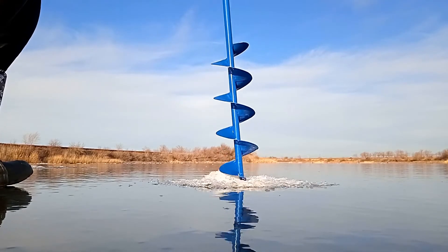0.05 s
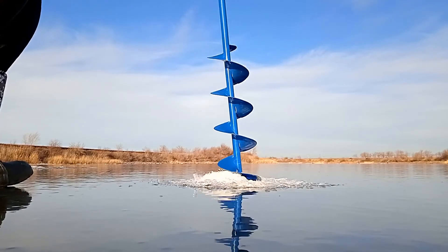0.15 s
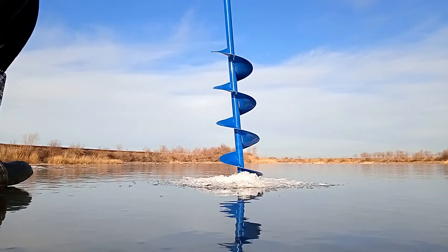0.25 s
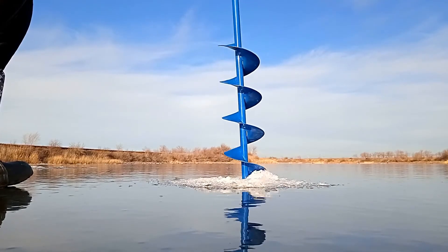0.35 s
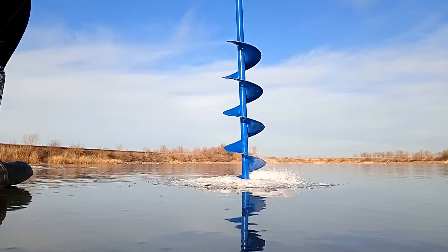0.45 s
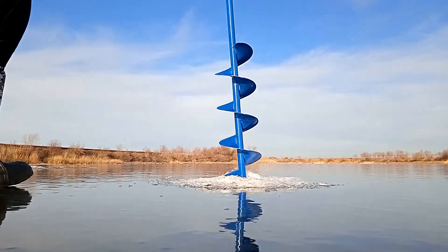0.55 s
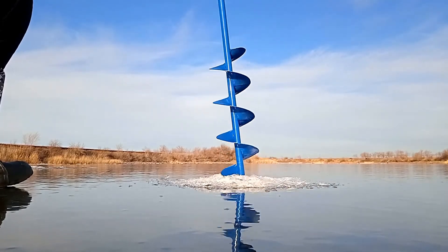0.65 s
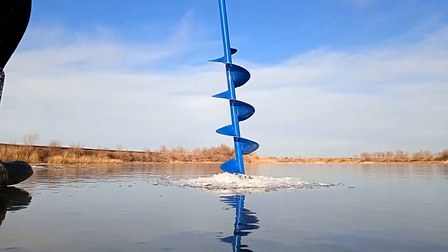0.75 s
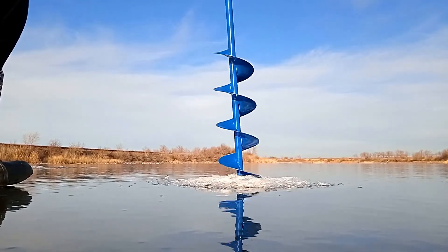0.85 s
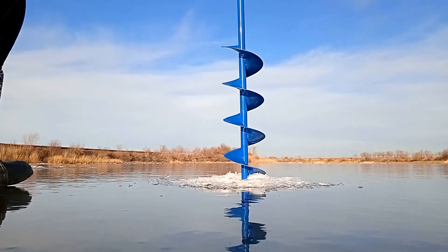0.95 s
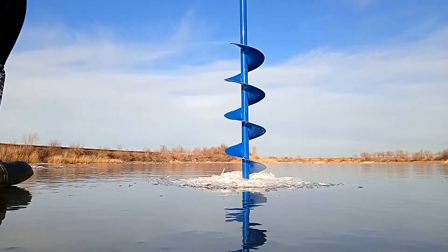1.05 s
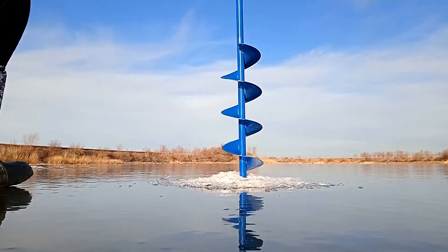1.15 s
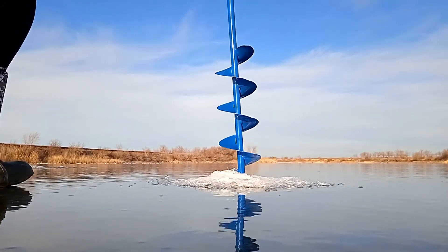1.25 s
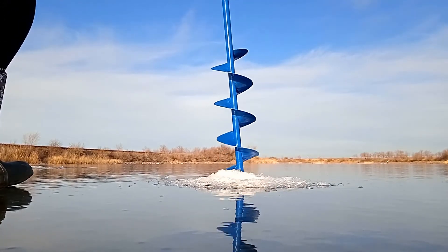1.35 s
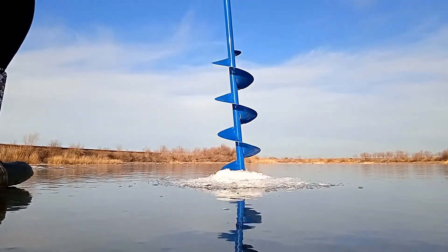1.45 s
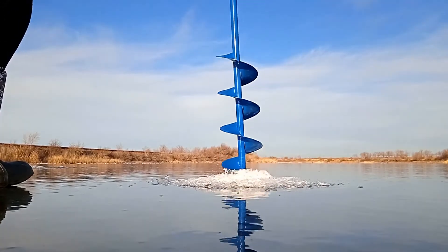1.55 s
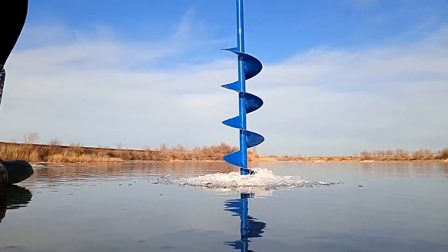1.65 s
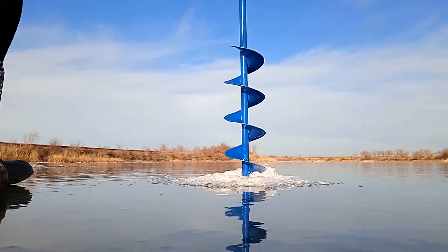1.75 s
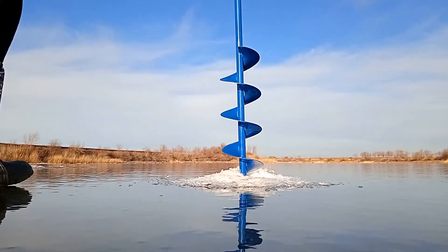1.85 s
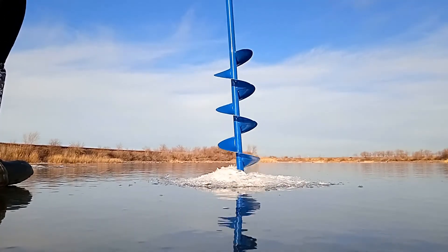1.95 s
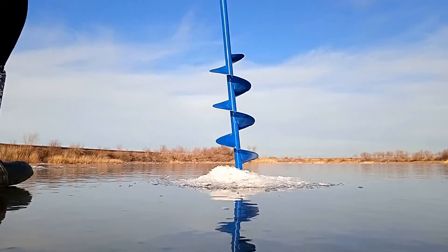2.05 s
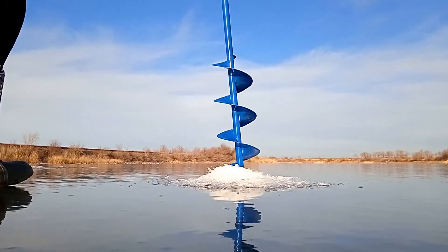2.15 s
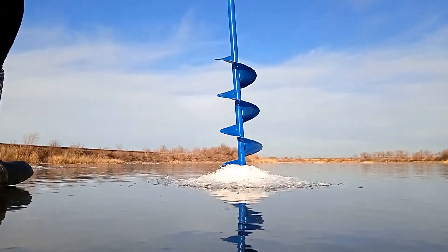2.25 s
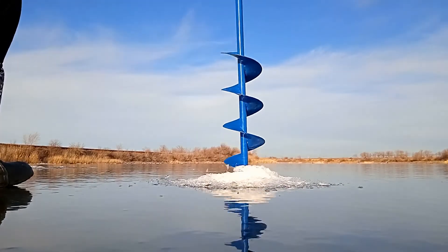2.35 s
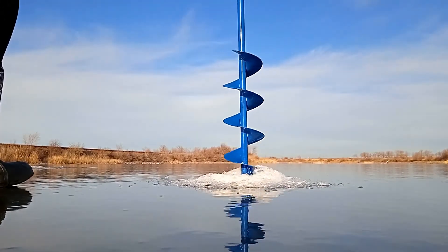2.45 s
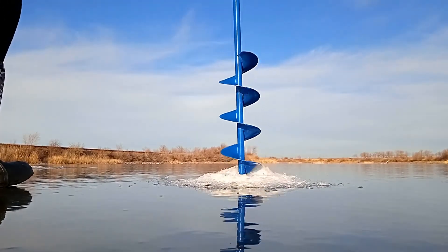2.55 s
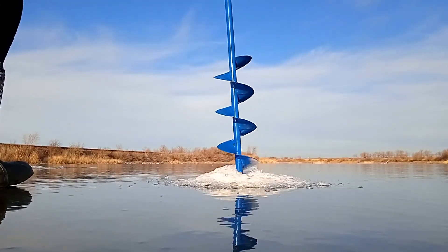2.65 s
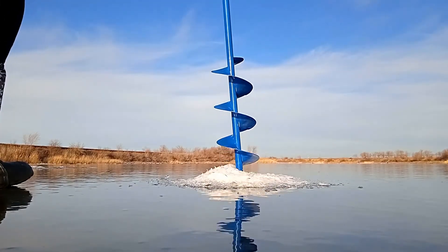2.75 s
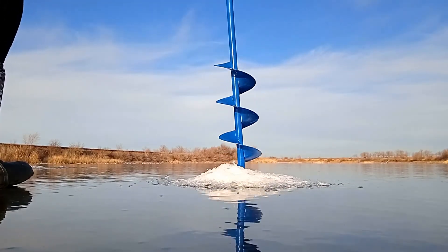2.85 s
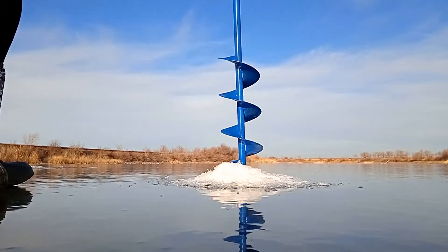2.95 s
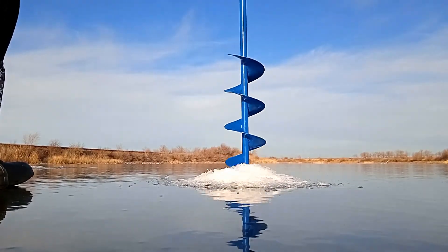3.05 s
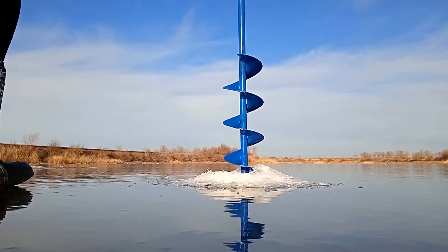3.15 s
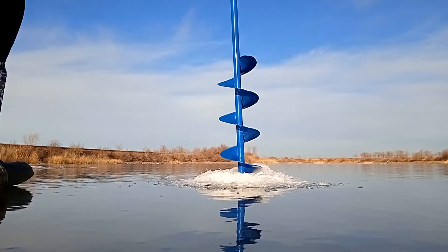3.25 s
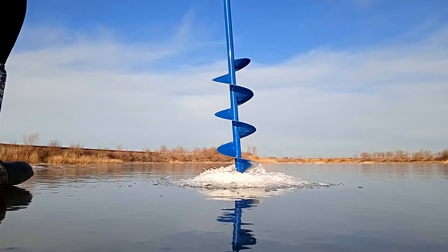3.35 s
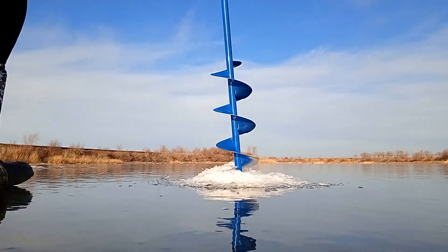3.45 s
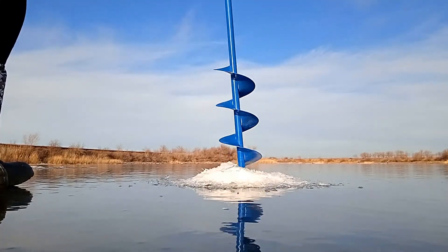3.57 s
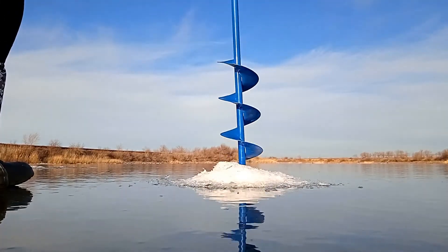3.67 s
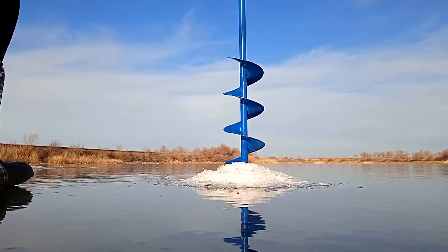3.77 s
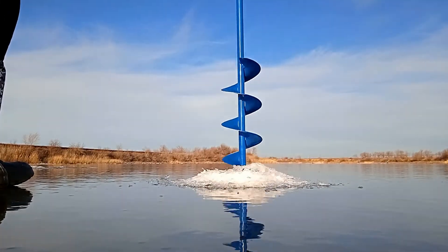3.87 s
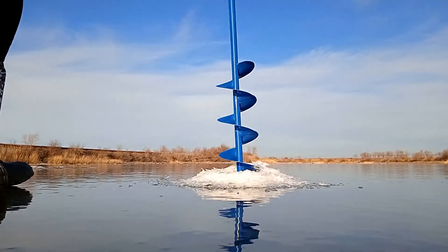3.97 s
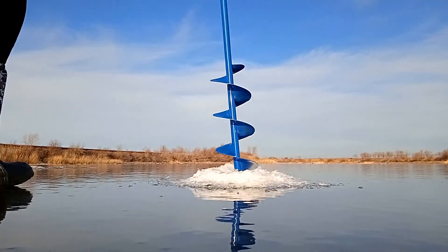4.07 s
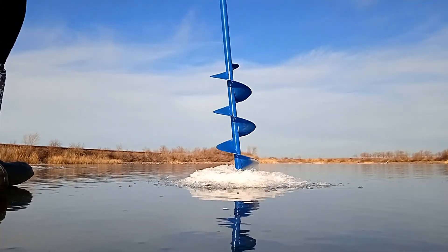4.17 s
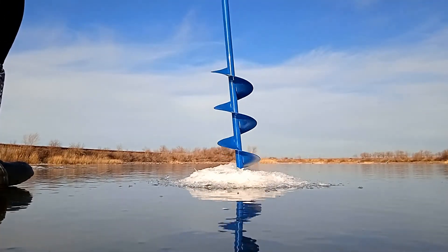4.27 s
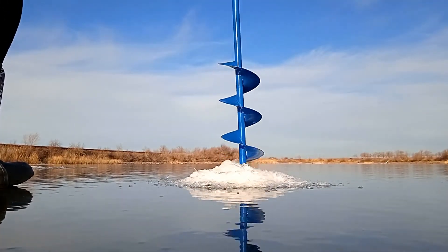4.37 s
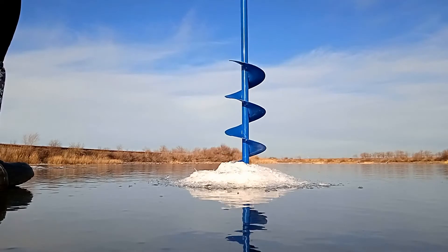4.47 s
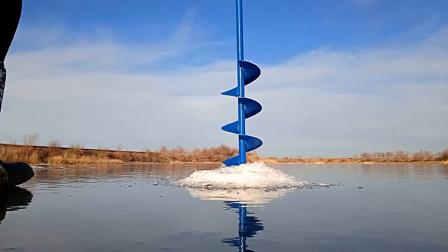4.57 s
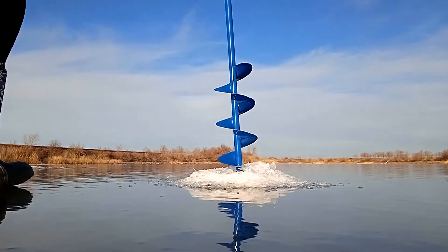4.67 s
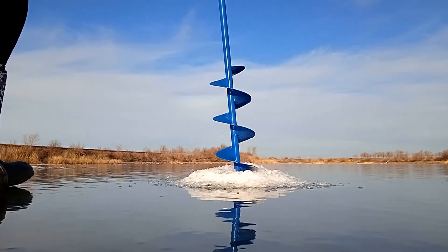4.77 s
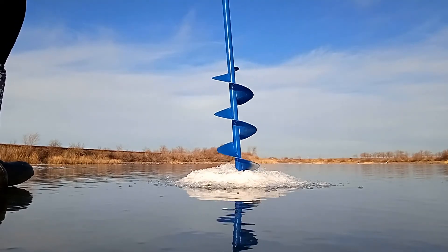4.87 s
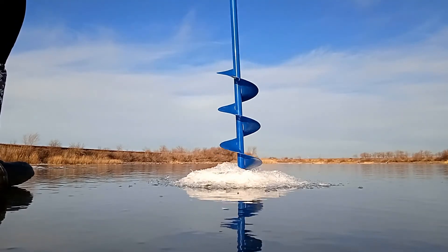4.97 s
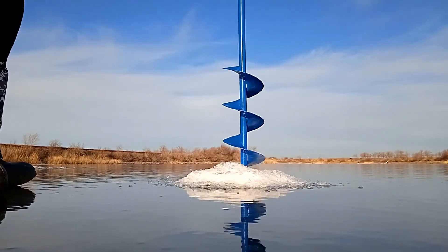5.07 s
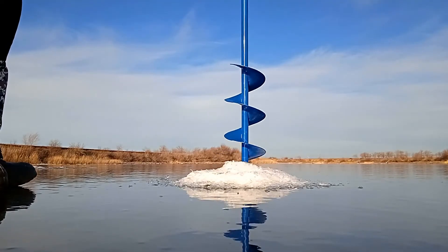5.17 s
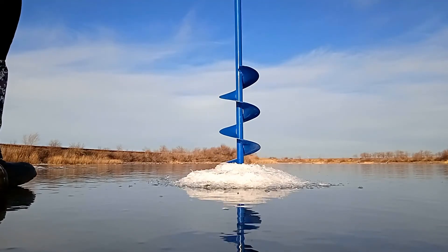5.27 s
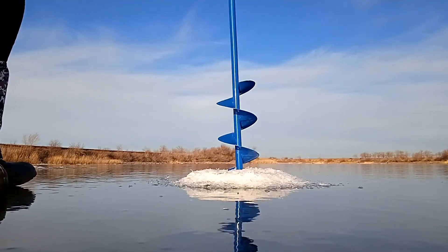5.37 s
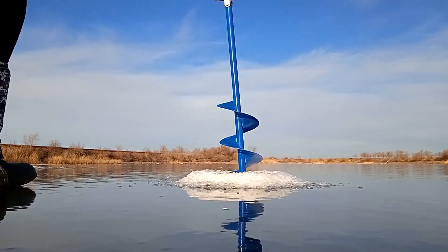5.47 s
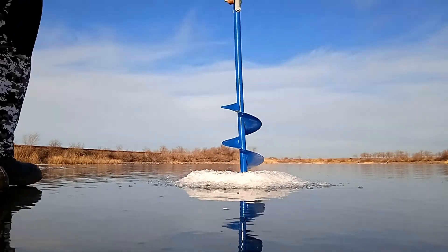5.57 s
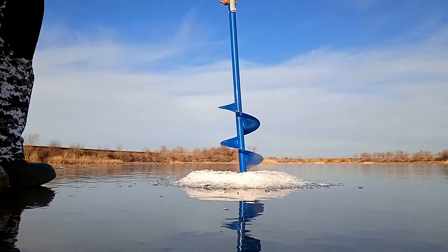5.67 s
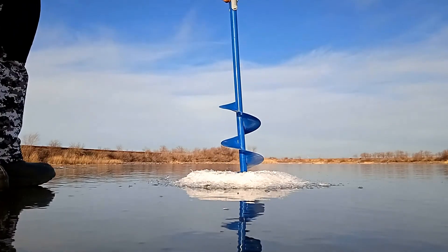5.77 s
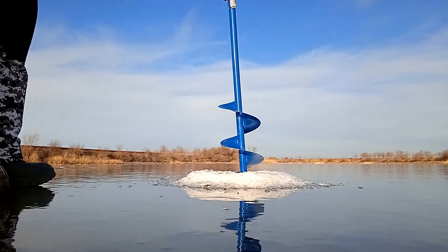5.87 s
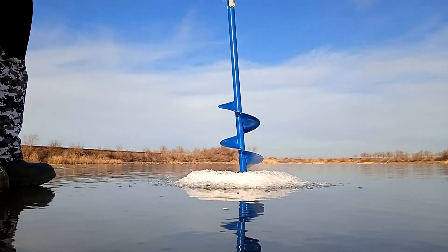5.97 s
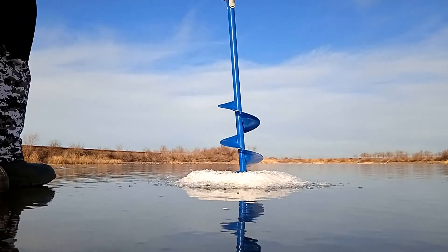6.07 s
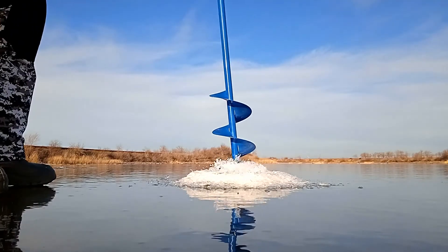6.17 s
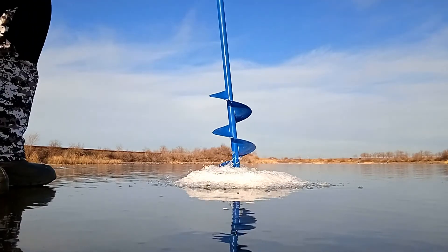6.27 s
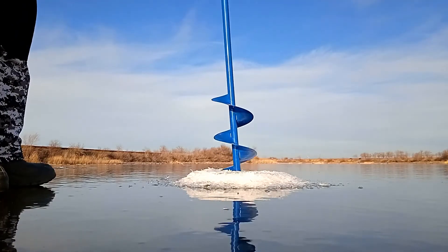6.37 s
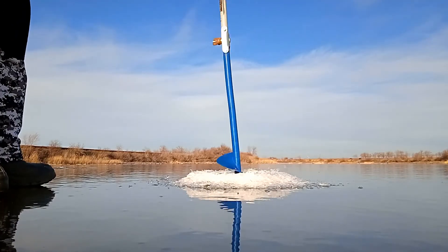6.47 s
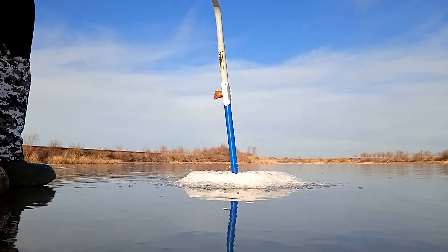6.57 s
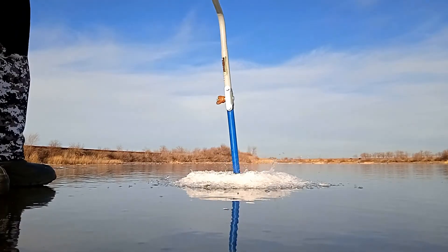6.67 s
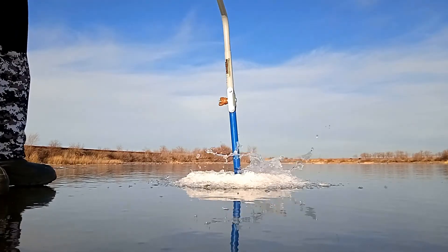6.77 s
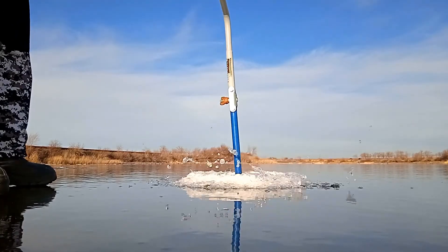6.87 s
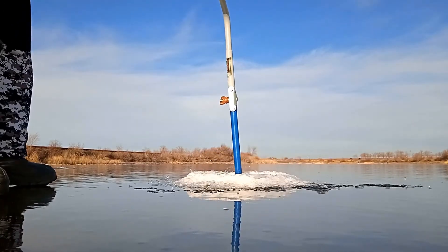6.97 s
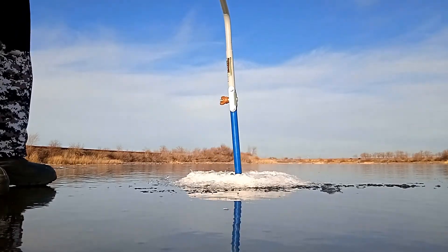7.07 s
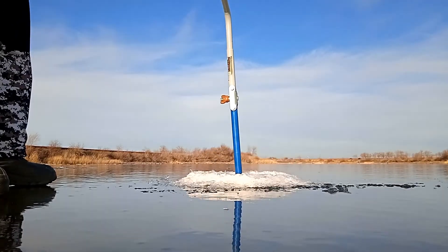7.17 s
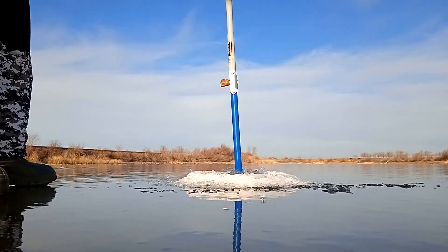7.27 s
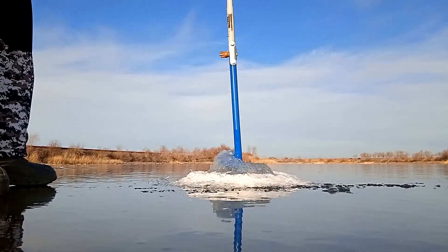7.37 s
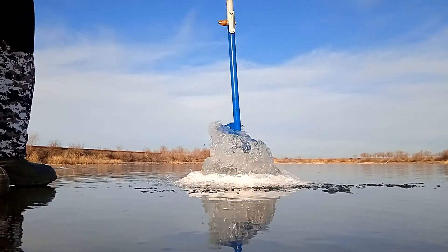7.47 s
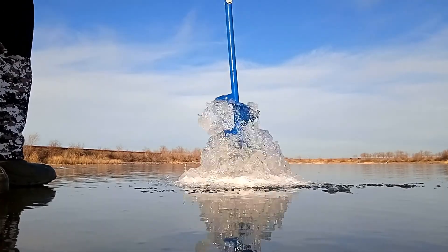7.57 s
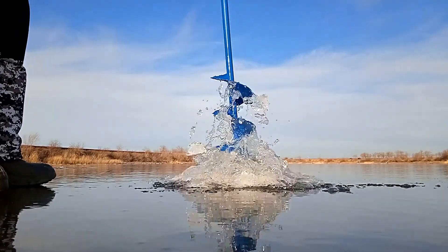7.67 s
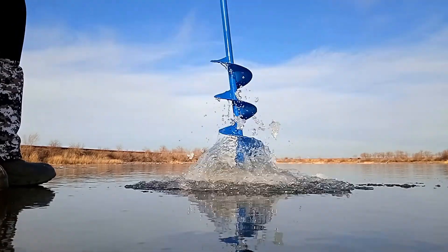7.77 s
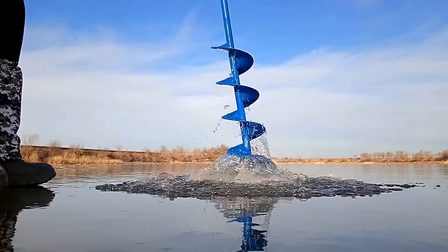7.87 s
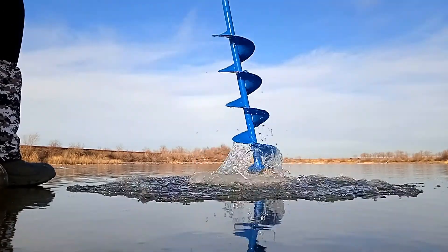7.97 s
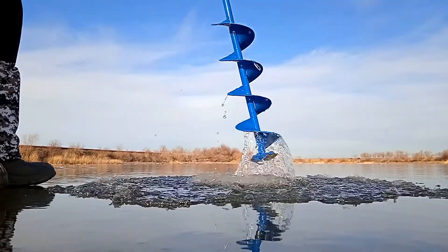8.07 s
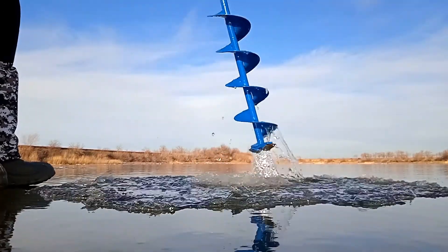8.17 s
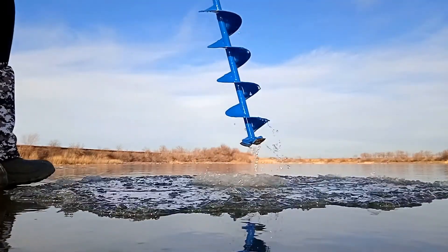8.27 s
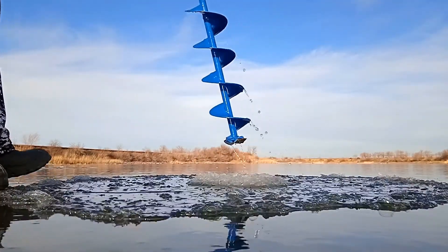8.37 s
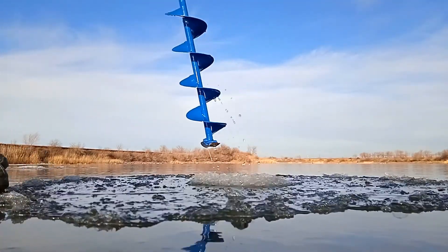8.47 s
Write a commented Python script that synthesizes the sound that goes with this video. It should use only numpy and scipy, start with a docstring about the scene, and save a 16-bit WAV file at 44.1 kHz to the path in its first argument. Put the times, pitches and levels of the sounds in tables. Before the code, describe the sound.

A hand auger cuts into pond ice, its blades rasping and crackling in swells with each turn while the steel rings. Wind gusts rumble on the microphone, which lies on the ice close by. The grinding stops, and after a pause the auger breaks through in two crunching jolts with a sharp ping. Water then gulps, sloshes and drips as the auger is pulled out.

```python
"""A frozen pond in a gusty breeze, the microphone lying on the ice close to a hand auger.
The turning blades chip the ice and ring the steel shaft and flights, while wind rumbles on the mic.
The cutting stops at about 5.3 s; after a pause the auger breaks through in two crunching jolts
that thud in the sheet. Trapped air gulps in the hole, and water and slush well up, slosh and
drip as the auger is pulled out."""
import sys
import numpy as np
from scipy import signal
from scipy.io import wavfile
from scipy.ndimage import uniform_filter1d

SR = 44100
rng = np.random.default_rng(int(sys.argv[2]) if len(sys.argv) > 2 else 0)


def store_pcm(level_fs):
    """Save levels as 16-bit WAV."""
    pcm = np.round(np.clip(level_fs, -1, 1) * 32767).astype(np.int16)
    wavfile.write(sys.argv[1], SR, np.atleast_2d(pcm).T)


N = 375907
TIME = np.arange(N) / SR
EVENT_TIME = np.arange(9000) / SR  # the span of one short sound


def gain_of(db):
    """Turns dB into a factor."""
    return 10 ** (np.asarray(db) / 20)


def unit_rms(x):
    """Scales to rms 1."""
    return x / np.sqrt(np.mean(x ** 2) + 1e-20)


def curves(rows):
    """Joins timed rows with straight lines, one curve for each column after the time."""
    times, *values = np.transpose(rows)
    return [np.interp(TIME, times, v) for v in values]


def add(mix, start_s, sound):
    """Mixes a sound in at its start time."""
    part = mix[round(start_s * SR):][:len(sound)]
    part += sound[:len(part)]


def colour(x, points):
    """Minimum-phase filter through (Hz, dB) points."""
    point_hz, db = np.transpose(points)
    hz = abs(np.fft.fftfreq(8192, 1 / SR))
    log_gain = np.log(gain_of(np.interp(np.log(hz + 1), np.log(point_hz + 1), db)))
    response = np.exp(np.conj(signal.hilbert(log_gain)))
    taps = np.fft.ifft(response).real[:4096]
    return signal.oaconvolve(x, taps)[:len(x)]


def ring(x, hz, width_hz):
    """A resonance of gain 1 at its centre."""
    r = np.exp(-np.pi * width_hz / SR)
    feedback = [2, -4 * r * np.cos(2 * np.pi * hz / SR), 2 * r * r]
    return signal.lfilter([1 - r * r, 0, r * r - 1], feedback, x)


def drift(per_s):
    """A random curve that heads for a new value per_s times a second."""
    knots = rng.standard_normal(2000)
    return np.interp(TIME * per_s, np.arange(len(knots)), knots)


def grit(per_s, spread_db, hiss):
    """Clicks of uneven size over a share of smooth noise."""
    chance, size, noise = rng.random(N), rng.exponential(1, N), rng.standard_normal(N)
    clicks = (chance < per_s / SR) * gain_of(spread_db * np.minimum(size, 5)) * np.sign(noise)
    return unit_rms(unit_rms(clicks) + hiss * noise)


def patchy(x, depth_db):
    """Raises and lowers random patches of time and pitch."""
    spectrum = signal.stft(x, nperseg=512, noverlap=384)[2]
    patches = uniform_filter1d(rng.standard_normal(spectrum.shape), size=7, axis=0)
    patches = uniform_filter1d(patches, size=16, axis=1)
    spectrum *= gain_of(depth_db * unit_rms(patches))
    return signal.istft(spectrum, nperseg=512, noverlap=384)[1][:N]


def bump(centre_s, length_s, order=2):
    """A rise and fall of height 1; a higher order gives a flatter top and steeper edges."""
    return np.exp(-(abs(TIME - centre_s) / (.55 * length_s)) ** order)


def burst(db, rise_s, t60_s):
    """A quick rise into a steady decay."""
    return gain_of(db - 60 * EVENT_TIME / t60_s) * np.minimum(EVENT_TIME / rise_s, 1)


def bursts(rows, rise_s, t60_s):
    """An envelope with one burst for each (start, dB) row."""
    envelope = np.zeros(N)
    for start_s, db in rows:
        add(envelope, start_s, burst(db, rise_s, t60_s))
    return envelope


# The cut beside the mic, fading as the hole deepens.
# Each row: time in seconds, blade pressure in dB, feed to the shaft in dB.
CUT_LEVELS = [(0, -37, -7), (.45, -36.5, -5), (.9, -38.5, -1.5), (1.3, -38.5, 2.5), (2.0, -37, -1),
              (2.7, -39, 2), (3.4, -40.5, 2), (4.2, -41, -1), (4.9, -43.5, 1.5), (5.31, -40.5, -3.5),
              (5.36, -88, -7)]
# The blades skip and the cut dips. Each row: centre in seconds, depth in dB.
BLADE_SKIPS = [(.85, 2), (1.87, 3), (2.2, 4), (2.53, 4.5), (2.72, 0.5), (2.84, 1), (3.27, 6), (3.53, 1),
               (3.88, 6.5), (4.08, 11), (4.27, 2), (5.0, 3), (5.17, 4)]
# A blade bites off a larger chip. Each row: start in seconds, level in dB.
BLADE_BITES = [(0.132, -38.5), (0.371, -35.5), (0.428, -50.5), (0.759, -37), (0.966, -31.5), (0.997, -33),
               (1.189, -36.5), (1.221, -43), (1.687, -35), (1.711, -29), (1.951, -39.5), (2.002, -44.5),
               (2.3016, -54), (2.431, -33), (2.565, -34.5), (2.765, -39), (2.8596, -48), (2.99, -32.5),
               (3.015, -30.5), (3.1214, -52), (3.4497, -38), (3.831, -58), (3.974, -32.5), (4.029, -32.5),
               (4.114, -42), (4.149, -38), (4.429, -39), (4.69, -35.5), (4.774, -42), (4.834, -40),
               (4.9211, -35), (5.028, -37.5), (5.08, -35.5)]
CUTTING_ON = TIME < CUT_LEVELS[-1][0]
TURNS_PER_S = 1.463


def crank_swing(peak_s):
    """A swing between -1 and 1, once for each turn of the crank."""
    return np.cos(2 * np.pi * TURNS_PER_S * (TIME - peak_s))


def blade_force():
    """The blades press harder on each downward push of the crank, and skip and bite on the way."""
    pressure_db = curves(CUT_LEVELS)[0] + 1.4 * crank_swing(peak_s=0.55)
    pressure_db -= sum(db * bump(centre_s, length_s=0.064) for centre_s, db in BLADE_SKIPS)
    bites = bursts(BLADE_BITES, rise_s=0.0012, t60_s=0.092)
    return (gain_of(pressure_db + 2.02 * drift(45)) + bites) * CUTTING_ON


# Breaking ice, heard close. Each row: frequency in Hz, level in dB.
CHIP_SPECTRUM = [(120, -17), (250, 2.5), (400, -5), (750, -6), (1280, 0.5), (1600, 6.5), (2350, 10),
                 (2620, 1), (3000, 1.5), (5200, -7.5), (5700, 0), (7300, -8), (9000, 1), (16000, -8.5)]


def chips(force):
    """Ice breaks under the blades in a dense run of tiny clicks."""
    fractures = force * grit(1800, spread_db=3.35, hiss=0.65)
    return patchy(colour(fractures, CHIP_SPECTRUM), depth_db=3.95)


# Modes of the shaft, and of the blades and flights. Each entry: pitch in Hz.
SHAFT_PITCHES = [520, 623, 830]
BLADE_PITCHES = [980, 1111, 1187, 1405, 1573, 2122, 2335, 2800, 2900, 3232, 3340, 3600, 3740, 3880, 4465,
                 4550, 4655, 4830, 5000, 5180, 5400, 5600, 5790, 5950, 6340, 6790, 6950, 7300]
# The same modes, in the same order. Each row: width in Hz, level in dB.
SHAFT_MODES = [(22, .5), (17, -2.5), (40, -11.5)]
BLADE_MODES = [(25.3, -14.5), (14.6, -15), (15.2, -11.5), (14.5, -5), (22, -4.5), (37, -3), (60.6, 1),
               (60, -9.5), (43, -5), (35.2, -6), (16, -6), (60, -9.5), (34, -3), (60.4, -8.5), (35, -2.5),
               (22, -11), (35, -5), (40.4, -13.5), (40.2, -10), (40, -10), (59.2, -13), (150, -11.5),
               (60, -13), (60, -10), (120, -9.5), (25.03, -13), (200, -4), (80, -2.5)]
# One mode sings out. Each row: centre in seconds, pitch in Hz, rise in dB, length in seconds.
MODE_SQUEALS = [(.145, 1405, 10, .11), (.17, 3740, 13, .28), (1.45, 3740, 6, .15), (.595, 2900, 11, .09),
                (.7, 3740, 6, .2), (.925, 1187, 8, .25), (1.215, 1573, 11, .13), (1.365, 2900, 11, .09),
                (1.685, 2335, 8, .3), (1.735, 3340, 12, .16), (1.755, 1187, 9, .13), (2.105, 1405, 11, .14),
                (2.135, 3740, 7, .13), (2.32, 4550, 8, .1), (1.2, 4465, 5, .3), (2.955, 1187, 9, .25),
                (3.895, 2122, 11, .15), (3.99, 1187, 11, .12), (4.82, 1187, 11, .1), (4.8, 1405, 10, .1),
                (5.06, 2335, 10, .15), (5.1, 1573, 10, .08)]


def steel_ring(drive, pitches, modes, wander_db, per_s):
    """The point of contact wanders, so each mode of the steel is fed more or less in turn."""
    sound = np.zeros(N)
    for k, (hz, (width, db)) in enumerate(zip(pitches, modes)):
        feed_db = db + wander_db * drift(per_s)
        for centre_s, squeal_hz, rise_db, length_s in MODE_SQUEALS:
            if squeal_hz == hz:
                feed_db += (db + rise_db - feed_db) * bump(centre_s, length_s)
        sound += (-1) ** k * ring(gain_of(feed_db) * drive, hz, width) / np.sqrt(width)
    return sound


def flights(drive, width_hz=34.6, wander_db=8.5):
    """The thin flights hold a crowd of faint high modes, caught more or less in turn."""
    sound = np.zeros(N)
    for hz in np.geomspace(5400, 11450, num=60) * rng.uniform(.99, 1.01, size=60):
        feed = gain_of(wander_db * np.tanh(drift(9.8)))
        sound += ring(feed * drive, hz, width_hz)
    return patchy(sound / np.sqrt(width_hz), depth_db=4.5)


# The high hiss of shavings, heard close. Each row: frequency in Hz, level in dB.
SHAVING_SPECTRUM = [(5000, -35.5), (8000, 3.5), (16000, 5.5)]


def shavings(force):
    """Fine shavings slide up the flights, following the smoothed force of the blades."""
    flow = uniform_filter1d(force, size=3000) * CUTTING_ON
    return flow * colour(rng.standard_normal(N), SHAVING_SPECTRUM)


def auger():
    """Chips breaking under the blades reach the mic directly and ring the shaft and steel."""
    force = blade_force()
    drive = force * grit(3500, spread_db=3.85, hiss=0.52)
    cut = gain_of(2.5) * chips(force)
    cut += gain_of(36.5) * steel_ring(drive, BLADE_PITCHES, BLADE_MODES, wander_db=4.8, per_s=10)
    cut += gain_of(20.5) * flights(drive)
    low = signal.sosfilt(signal.butter(4, 2550, fs=SR, output="sos"), cut)
    high = signal.sosfiltfilt(signal.butter(2, 4000, "high", fs=SR, output="sos"), cut)
    cut += (gain_of(5) - 1) * low  # body weight on the handle darkens the cut
    cut += (gain_of(crank_swing(peak_s=0.33)) - 1) * high  # the bright rasp swells once a turn
    shaft_drive = gain_of(curves(CUT_LEVELS)[1]) * drive
    shaft = steel_ring(shaft_drive, SHAFT_PITCHES, SHAFT_MODES, wander_db=3, per_s=16)
    return cut + gain_of(40) * shaft + gain_of(5) * shavings(force)


# The breeze at ice level, right on the mic. Each row: time in seconds, level in dB.
BREEZE_LEVELS = [(0, -65.5), (1.7, -62), (2.36, -76.5), (3.2, -55.5), (4.4, -77), (5.2, -59), (5.7, -75),
                 (6.9, -68.5), (7.4, -62), (8.52, -65.5)]
# Gusts on the mic. Each row: centre in seconds, level in dB, length in seconds.
MIC_GUSTS = [(0.033, -48, 0.17), (0.556, -40, 0.28), (0.907, -35.5, 0.16), (1.118, -51.5, 0.19),
             (1.285, -38, 0.14), (1.576, -37.5, 0.25), (1.75, -40, 0.21), (2.14, -45.5, 0.2),
             (2.894, -47, 0.044), (2.944, -40.5, 0.047), (3.415, -61, 0.043), (3.67, -47, 0.032),
             (3.73, -48, 0.041), (6.682, -64, 0.14), (7.825, -49, 0.021), (7.856, -44, 0.03),
             (7.979, -44, 0.1), (8.246, -53.5, 0.031), (8.328, -54, 0.03), (8.478, -45, 0.12)]
# Their rumble. Each row: frequency in Hz, level in dB.
RUMBLE_SPECTRUM = [(20, -30.5), (45, -18.5), (75, -1), (120, 1), (190, -3.5), (330, -18.5), (600, -55)]


def wind():
    """Lumpy rumble of air across the microphone, its pitch swaying with the eddies."""
    eddy_hz = 105 * gain_of(4.0 * drift(30))
    eddies = np.sin(2 * np.pi * np.cumsum(eddy_hz) / SR)
    rumble = unit_rms(colour(rng.standard_normal(N), RUMBLE_SPECTRUM)) + 1.05 * eddies * drift(25)
    gusts = sum(gain_of(db) * bump(centre_s, length_s, order=4) for centre_s, db, length_s in MIC_GUSTS)
    flow = gain_of(curves(BREEZE_LEVELS)[0]) + gusts
    return flow * gain_of(1.4 * drift(22)) * rumble


# The open air around the pond. Each row: frequency in Hz, level in dB.
HUSH_SPECTRUM = [(180, -35), (300, -10.5), (391, 2.5), (1680, -11.5), (6030, -24.5), (9600, -22.5),
                 (15800, -20)]


def air():
    """A faint, even hush of open country."""
    hush = patchy(colour(rng.standard_normal(N), HUSH_SPECTRUM), depth_db=1.5)
    return gain_of(-78.5) * unit_rms(hush)


# Near the mic: ice splinters while cutting, a crack at breakthrough, low drips at the end.
# Each row: start in seconds, level in dB, centre pitch in Hz.
SNAPS_AND_TICKS = [(.2246, -21.5, 7000), (.7625, -25, 3820), (1.074, -32, 4370), (1.217, -22, 6400),
                   (1.6244, -32, 4640), (2.297, -23, 4500), (2.49, -23.5, 3930), (2.6784, -26, 6200),
                   (2.765, -31, 6470), (2.862, -27.5, 3340), (3.124, -25, 6400), (3.4307, -28, 6100),
                   (3.652, -33, 4500), (3.73, -28, 6800), (3.9337, -32, 4480), (4.2453, -26.5, 7200),
                   (4.431, -28, 6700), (4.834, -32, 3300), (5.027, -36, 6100), (6.4112, -22, 4340),
                   (7.887, -42.5, 1950), (8.483, -56, 1300), (8.495, -55.5, 1290)]


def snaps_and_ticks():
    """Each snap or tick is a short burst of noise around its own pitch."""
    mix = np.zeros(N)
    for start_s, db, hz in SNAPS_AND_TICKS:
        band = unit_rms(ring(rng.standard_normal(len(EVENT_TIME)), hz, width_hz=1100))
        add(mix, start_s, burst(db, rise_s=0.0011, t60_s=0.059) * band)
    return mix


# Close by: crunching ice jolts, then thudding sloshes of water as the auger comes out.
# Each row: start in seconds, treble level in dB, offset in dB for the push that drives the thud.
JOLTS_AND_SLOSHES = [(5.32, -25.5, 7.5), (5.563, -42, 2), (5.9994, -56.5, 10), (6.023, -45, -4),
                     (6.032, -35, -13), (6.044, -38, 5), (6.0556, -18.5, -1), (6.066, -23.5, 8),
                     (6.075, -20.5, -14), (6.085, -26, 10.5), (6.093, -47, -3), (6.287, -42.5, 1),
                     (6.296, -31, 0.5), (6.309, -27.5, -3.5), (6.322, -20.5, 4.5), (6.338, -17.5, -3),
                     (6.3563, -19, 4.5), (6.375, -18.5, -1.5), (6.396, -14, 0.5), (6.409, -5, -17),
                     (6.4127, -10.5, -3), (6.422, -33, 15), (6.433, -43.5, 8), (6.4856, -33.5, 16.5),
                     (6.5187, -31, 15), (7.207, -43, -5), (7.278, -55, 18), (7.412, -35.5, 7.5),
                     (7.4467, -37, 3), (7.5144, -13.5, -12), (7.56, -28.5, 4.5), (7.612, -25, -11),
                     (7.665, -29.5, -2), (7.718, -45, 1)]
# The modes of their thud. Each row: pitch in Hz, width in Hz, level in dB.
THUD_MODES = [(205, 82, -8.5), (374, 150, -2.5), (554, 220, 2), (1000, 700, 2), (1600, 740, 0)]
# Drops and crumbs tick on the ice nearby. Each row: start in seconds, level in dB.
DRIP_TICKS = [(5.62, -60), (5.776, -49), (6.6044, -52), (6.76, -43), (6.909, -54), (6.933, -51),
              (7.165, -47), (7.722, -33), (7.739, -44), (7.9485, -40), (7.994, -41.5), (8.0586, -46),
              (8.0845, -43), (8.1194, -45), (8.162, -44), (8.213, -43), (8.26, -49), (8.284, -47)]
# Flung water lands, too light to thud. Each row: start in seconds, level in dB.
WATER_SPATTERS = [(6.814, -39), (6.842, -32), (6.8844, -53), (7.795, -31.5), (7.833, -29), (7.886, -33),
                  (8.232, -44)]
# Cracking ice and fine spray, heard close. Each row: frequency in Hz, level in dB.
SPRAY_SPECTRUM = [(700, -20.5), (1500, -3), (3000, -9.5), (7000, -7), (16000, 0)]


def ice_and_water_hits(wet_damping=1.1):
    """Ice jolts and water sloshes crackle over a thud, drips and spatters land; all ring the steel."""
    shape = dict(rise_s=0.0061, t60_s=0.076)
    push = bursts([(start_s, db + offset_db) for start_s, db, offset_db in JOLTS_AND_SLOSHES], **shape)
    push *= rng.standard_normal(N)
    thud = sum((-1) ** k * gain_of(db) * ring(push, hz, width) / np.sqrt(width)
               for k, (hz, width, db) in enumerate(THUD_MODES))
    hits = bursts([(start_s, db) for start_s, db, _ in JOLTS_AND_SLOSHES], **shape)
    hits += bursts(DRIP_TICKS, rise_s=0.0004, t60_s=0.027)
    hits += bursts(WATER_SPATTERS, rise_s=0.0063, t60_s=0.093)
    grains = hits * grit(6800, spread_db=2.1, hiss=0.84)
    crackle = patchy(colour(grains, SPRAY_SPECTRUM), depth_db=3)
    # The grip of ice and water widens the struck modes.
    steel = sum(gain_of(db) * ring(crackle, hz, width * wet_damping) / np.sqrt(width)
                for hz, (width, db) in zip(SHAFT_PITCHES + BLADE_PITCHES, SHAFT_MODES + BLADE_MODES))
    return gain_of(12.5) * steel + gain_of(1) * crackle + gain_of(32.5) * thud


# Air trapped down the hole. Each row: start in seconds, starting pitch in Hz, level in dB.
AIR_GULPS = [(5.326, 1000, -26.5), (5.562, 316, -45), (6.039, 322, -32), (6.056, 410, -25.5),
             (6.076, 632, -18), (6.09, 1120, -26), (6.108, 624, -36), (6.125, 637, -47), (6.33, 242, -21.5),
             (6.36, 766, -22), (6.411, 1600, -18.5), (6.486, 606, -22), (6.517, 1170, -23.5),
             (6.445, 800, -25), (6.759, 3330, -59), (7.208, 340, -39), (7.212, 786, -40.5),
             (7.304, 394, -41), (7.334, 410, -44), (7.37, 410, -45), (7.414, 400, -34), (7.453, 490, -46),
             (7.478, 595, -35), (7.516, 445, -16), (7.521, 910, -20.5), (7.526, 286, -21),
             (7.562, 1106, -36), (7.569, 400, -32), (7.584, 314, -29.5), (7.601, 468, -34),
             (7.623, 400, -33), (7.635, 770, -38), (7.7, 774, -38), (7.716, 1250, -40), (7.733, 434, -45),
             (7.77, 432, -46), (7.825, 2920, -42), (7.992, 282, -33)]


def gulps(glide=0.091):
    """Trapped air shrinks as it rings, so each rounded note rises a little; its level wobbles."""
    mix = np.zeros(N)
    for start_s, hz, db in AIR_GULPS:
        t60_s = 0.083 * (518 / hz) ** 0.081  # higher notes die slightly sooner
        phase = 2 * np.pi * hz * EVENT_TIME * (1 + glide * EVENT_TIME / t60_s)
        add(mix, start_s, burst(db, rise_s=0.0021, t60_s=t60_s) * np.sin(phase))
    return mix * gain_of(3.5 * drift(220))


def bubbles(low_hz, high_hz, pops_per_cycle, spread_db):
    """A crowd of bubbles between two sizes, each rising in pitch as it dies."""
    mix = np.zeros(N)
    for hz in np.geomspace(low_hz, high_hz, num=14):
        cycles = np.arange(0, 24, hz / SR)
        envelope = np.exp(-cycles / 6) * np.minimum(cycles / 2, 1)
        bubble = envelope * np.sin(2 * np.pi * cycles * (1 + .005 * cycles))
        pops = (rng.random(N) < pops_per_cycle * hz / SR) * gain_of(spread_db * rng.exponential(1, N))
        mix += signal.oaconvolve(pops, bubble)[:N]
    return unit_rms(mix)


# Slush and water welling up near the mic.
# Each row: time in seconds, then the levels of hiss, deep gurgle and fine bubbling in dB.
SLUSH_LEVELS = [(5.37, -39.5, -55.5, -58), (5.55, -58.5, -63.5, -74), (5.97, -71, -75, -83),
                (6.25, -55, -64, -77), (6.38, -73, -64, -80), (6.47, -39.5, -40.5, -44),
                (6.62, -51, -52, -57), (6.87, -61.5, -78.5, -71), (7.2, -61, -65, -78),
                (7.39, -51, -61, -56), (7.44, -47.5, -41.5, -50), (7.5, -47, -52, -54),
                (7.59, -40, -41.5, -49), (7.68, -41, -55, -44), (7.8, -45, -62, -49.5),
                (7.9, -51, -58, -56.5), (7.99, -53.5, -68, -67), (8.3, -56.5, -71.5, -70),
                (8.52, -70, -67, -77)]


def slush():
    """Spray and crumbs of ice hiss; large bubbles gurgle in the hole, small ones burst on the ice."""
    hiss_db, gurgle_db, fine_db = curves(SLUSH_LEVELS)
    spray = colour(grit(1500, spread_db=2.2, hiss=0.72), SPRAY_SPECTRUM)
    hiss = unit_rms(patchy(spray, depth_db=2)) * gain_of(hiss_db + 2.2 * drift(60))
    gurgle = gain_of(gurgle_db + 3.1 * drift(25)) * bubbles(270, 900, pops_per_cycle=.08, spread_db=2)
    fine = gain_of(fine_db + 2.5 * drift(30)) * bubbles(750, 2700, pops_per_cycle=.06, spread_db=2.3)
    flowing = TIME > SLUSH_LEVELS[0][0] - .03
    return flowing * (hiss + gurgle + fine)


# Pings from the handle joint, above the mic. Each row: start in seconds, level in dB.
JOINT_PINGS = [(6.412, -18), (7.211, -53)]


def handle_joint(t60_s=0.16):
    """The joint pings with two close, high tones that beat as they die."""
    mix = np.zeros(N)
    tones = np.sin(2 * np.pi * 9350 * EVENT_TIME) + 0.7 * np.sin(2 * np.pi * 9480 * EVENT_TIME)
    for start_s, db in JOINT_PINGS:
        add(mix, start_s, gain_of(db - 60 * EVENT_TIME / t60_s) * tones)
    return mix


def scene():
    """One microphone on the ice feeds both channels."""
    at_hole = auger() + snaps_and_ticks() + ice_and_water_hits() + gulps() + slush() + handle_joint()
    return np.tile(at_hole + wind() + air(), (2, 1))


# The response of the camera microphone on the ice. Each row: frequency in Hz, gain in dB.
MIC_RESPONSE = [(25, -8), (65, -2.5), (7200, -4), (8000, -13.5), (11000, -20), (13600, -29), (15100, -11.5),
                (16000, -17.5)]


def record(dry, cutoff_hz=15870):
    """The microphone colours the sound, and a steep low-pass takes off the very top."""
    heard = np.array([colour(channel, MIC_RESPONSE) for channel in dry])
    low_pass = signal.firwin(1023, cutoff_hz, window=("kaiser", 10), fs=SR)
    return signal.oaconvolve(heard, low_pass[None], "same")


dry = scene()
out = record(dry)
store_pcm(out)
```